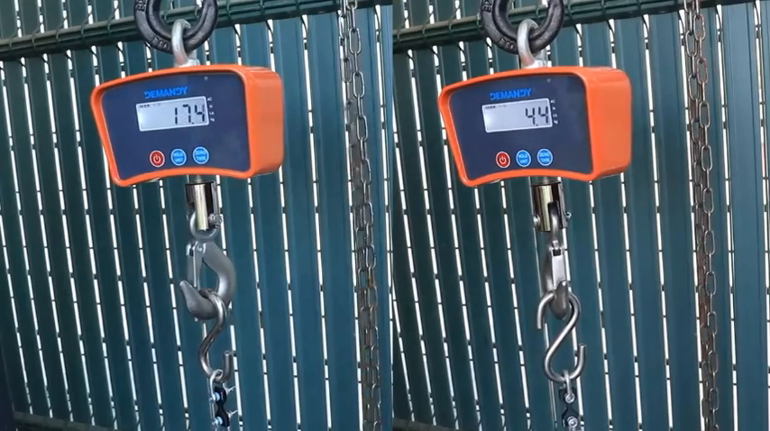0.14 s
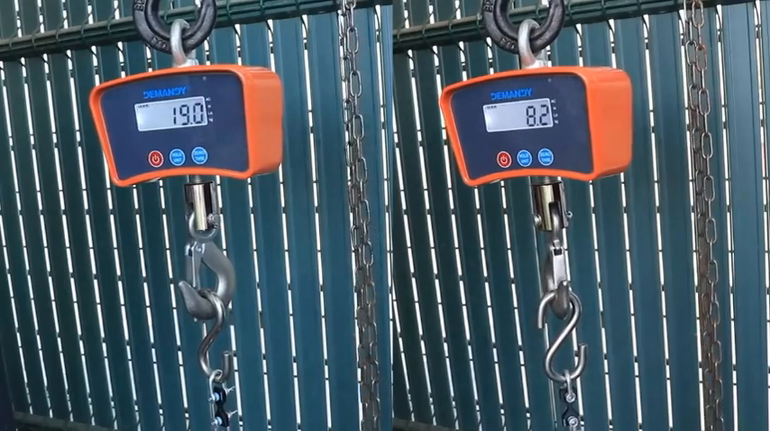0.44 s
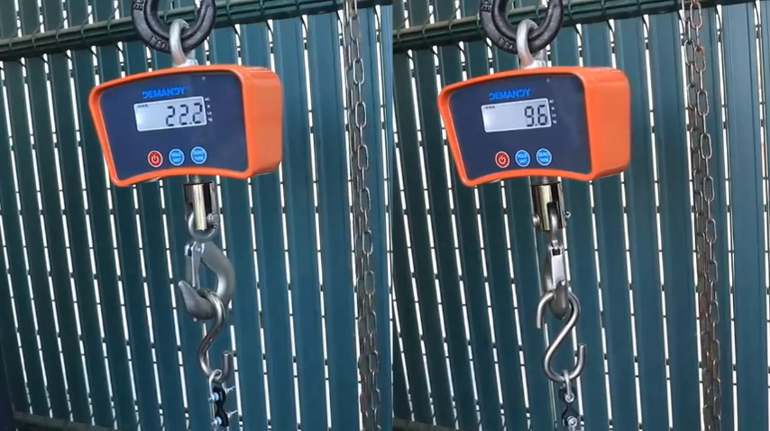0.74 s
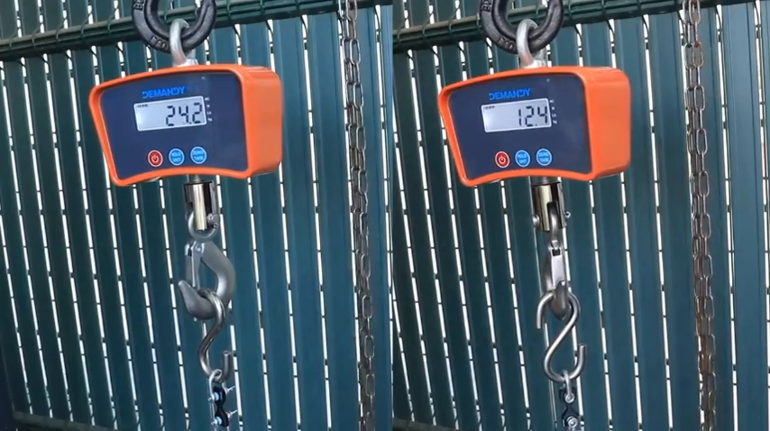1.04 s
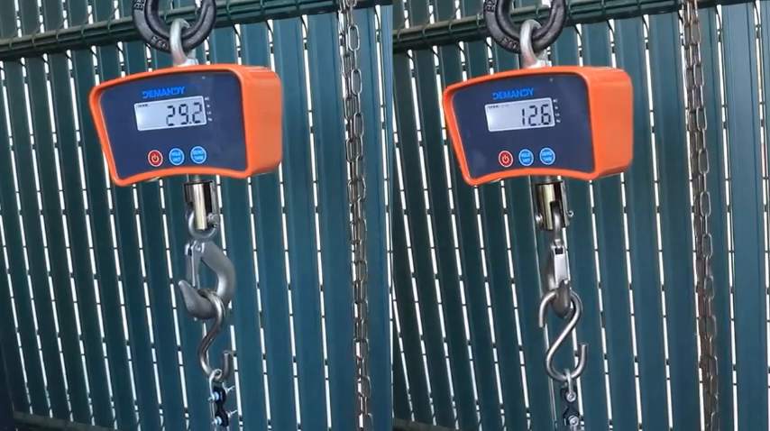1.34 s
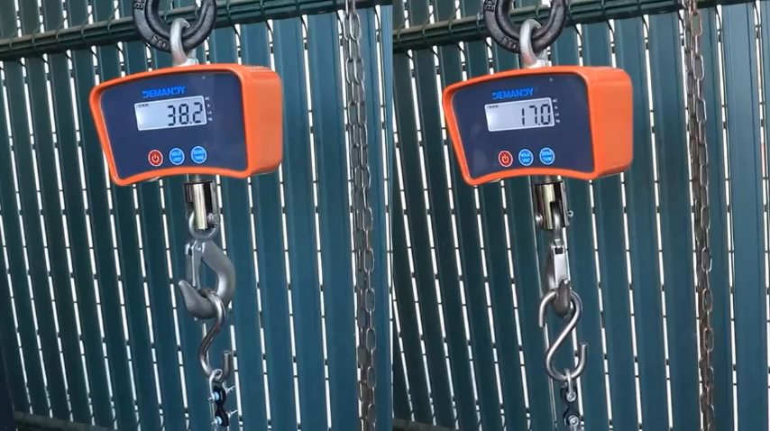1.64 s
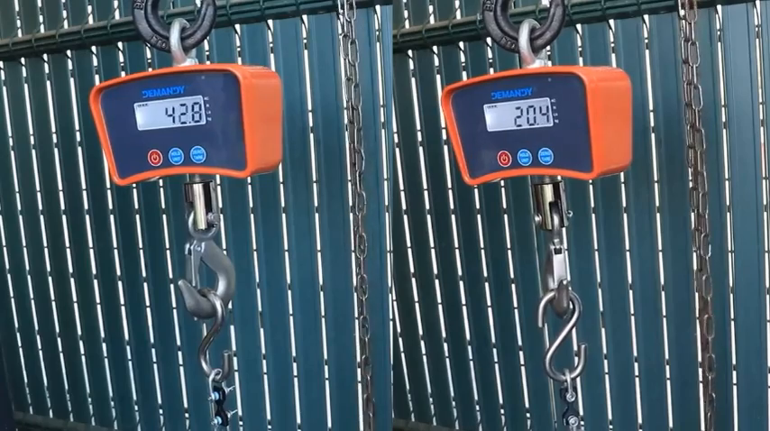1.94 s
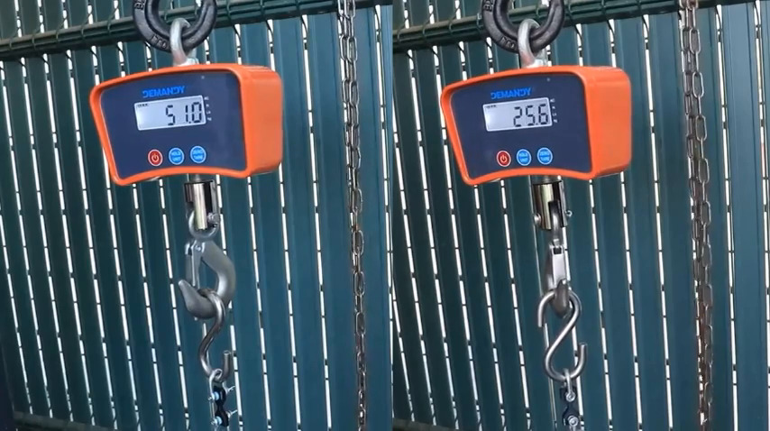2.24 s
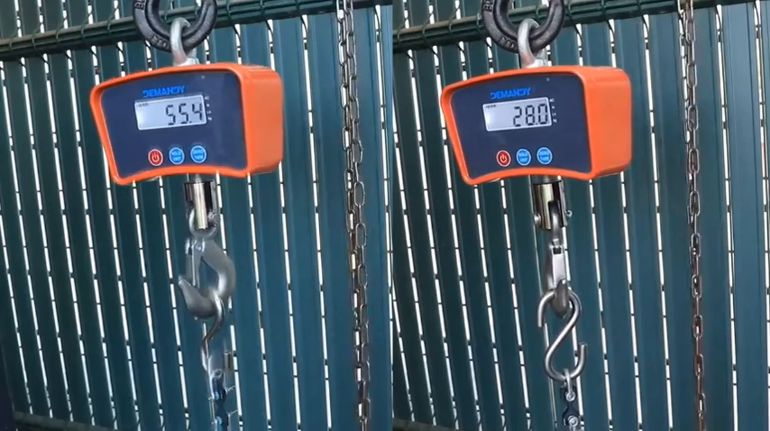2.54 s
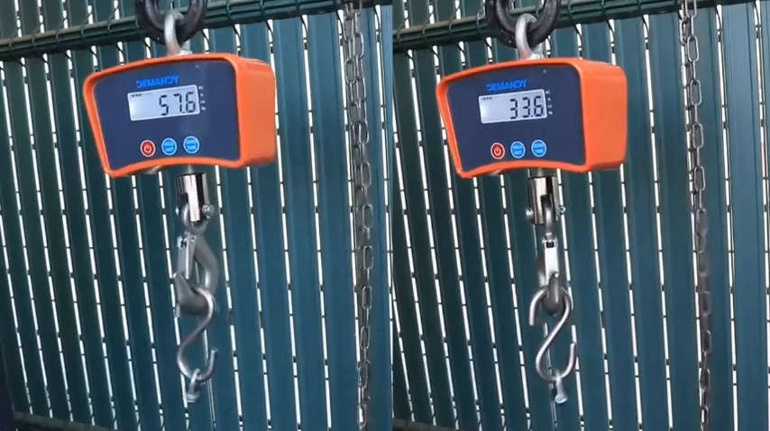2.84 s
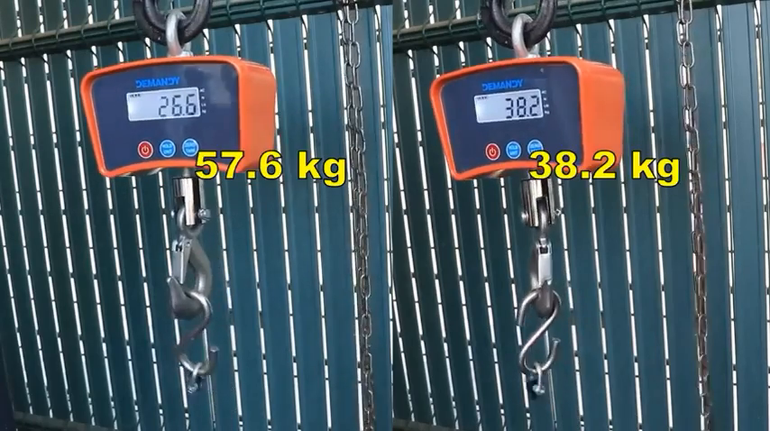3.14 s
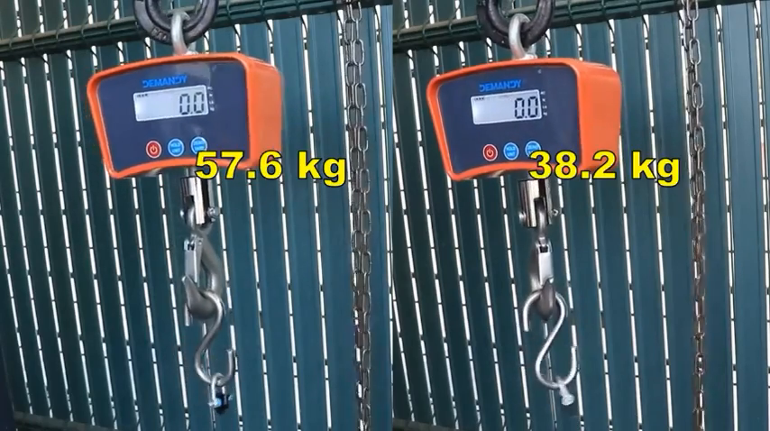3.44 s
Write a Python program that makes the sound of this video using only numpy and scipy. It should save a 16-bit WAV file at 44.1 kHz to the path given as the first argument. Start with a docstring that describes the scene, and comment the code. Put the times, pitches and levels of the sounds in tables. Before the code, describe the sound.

Metallic chain clicks under rising strain, then a sudden snap and loud rattle of swinging steel hooks.

```python
"""Chain hoist breaking a hanging scale

Outdoors by a fence, a chain hoist pulls on a hanging scale, a hook and an S-hook. Links click as shaped
noise through resonances; the rig creaks and scrapes as noise-modulated tones and grain. A plastic part
snaps: the freed steel hooks chatter (grit and sine pings), clack and ring (wavering sine modes), then knock
the scale's housing (cracks, damped sines) as they swing out. Fence and ground answer as a noise tail over
faint steady noise. Mono microphone; the recorder's two-band limiter holds the crash down."""
import sys
import numpy as np
from scipy import signal
from scipy.fft import rfft, irfft, next_fast_len
from scipy.io import wavfile
from scipy.ndimage import uniform_filter1d, minimum_filter1d, map_coordinates

SR = 44100
rng = np.random.default_rng(int(sys.argv[2]) if len(sys.argv) > 2 else 0)


def file_out(sig):
    """Save sig as 16-bit WAV at sys.argv[1]."""
    # one column per channel
    cols = np.atleast_2d(sig).T
    # limit, then scale
    lim = np.clip(cols, -1, 1)
    pcm = np.round(lim * 32767).astype(np.int16)
    wavfile.write(sys.argv[1], SR, pcm)


N = 158760  # samples, 3.6 s
TOP_HZ = 15750  # upper band limit of the recorder
LINK_SCATTER_DB = 2.5  # random spread of the chain's resonances from blow to blow

# All levels are relative, ahead of the limiter; colours are noise spectra before scaling to rms 1.
# gritty clicks of chain links under load, then three bright steel clacks during the crash:
# t/s at the end of the rise, level/dB, rise/s
CLICKS = [(0.184, -30, 0.022), (0.392, -32, 0.0046), (.857, -29.5, 0.007), (1.046, -28, 0.004),
          (1.261, -29.5, 0.0037), (1.402, -30.5, 0.0053), (1.474, -33, 0.0057), (1.822, -32, 0.0098),
          (1.88, -30.5, 0.006), (2.04, -32.5, 0.005), (2.295, -32, 0.0061), (2.889, -27.5, 0.0044),
          (2.926, -30, .003), (3.076, -30.5, .003)]
# spectrum of the click grit, also used for ticks: f/Hz, level/dB
CLICK_COLOUR = [(300, -27), (900, -7.5), (1600, -7), (4500, -3.5), (5600, 0), (7200, -2.5), (10300, 2),
                (13000, -6.5), (15800, -2.5)]
# creaks of the loaded rig: t/s, level/dB, t60/s, f/Hz
CREAKS = [(0.053, -52.5, 0.05, 5600), (0.365, -50.5, 0.051, 5400), (0.519, -56.5, 0.063, 2700),
          (0.755, -45.5, 0.025, 5440), (1.002, -44.5, 0.11, 5200), (1.287, -38, 0.052, 4520),
          (1.299, -39.5, 0.078, 2760), (1.345, -47.5, 0.1, 5540), (1.361, -50, 0.057, 6900),
          (1.599, -53.5, 0.043, 5420), (1.727, -40.5, 0.042, 5600), (1.737, -49.5, 0.065, 2560),
          (1.838, -45.5, 0.081, 899), (2.334, -49.5, 0.11, 804), (2.555, -52, 0.059, 5400)]
# spectrum of the creak grit, also used for scrapes: f/Hz, level/dB
CREAK_COLOUR = [(300, -11), (900, 7.5), (2000, 0.5), (2700, 8), (4000, -4), (5600, 9), (8000, -8),
                (15000, -11)]
# spectrum of the cracks, also the filter that dulls the chatter: f/Hz, level/dB
CRACK_COLOUR = [(60, -16), (250, -1.5), (800, 2), (1500, 6), (2900, 5.5), (4000, -6.5), (6000, -10.5),
                (9000, -18), (15000, -39)]


def amp(db):
    """Amplitude of a level in dB."""
    return 10 ** (np.asarray(db) / 20)


def unit(x):
    """Scale to rms 1."""
    return x / np.sqrt(np.mean(x ** 2) + 1e-20)


def along(points, hz):
    """Read (Hz, value) points on a log frequency axis."""
    f, v = np.transpose(points)
    return np.interp(np.log(hz + 1), np.log(f + 1), v)


def filtered(x, response):
    """Multiply the spectrum of x by a response of frequency."""
    m = next_fast_len(len(x) + SR // 2)
    return irfft(rfft(x, m) * response(np.fft.rfftfreq(m, 1 / SR)), m)[:len(x)]


def noise(colour):
    """Coloured noise of rms 1."""
    return unit(filtered(rng.standard_normal(N), lambda hz: amp(along(colour, hz))))


def sine(hz, t):
    """A steady tone."""
    return np.sin(2 * np.pi * hz * t)


def fade(t, t60):
    """Exponential decay that starts at t = 0 and falls 60 dB in t60 seconds."""
    return np.exp(-np.log(1000) * np.maximum(t, 0) / t60)


def add(out, s, sound):
    """Mix a sound in at time s."""
    part = out[max(round(s * SR), 0):][:len(sound)]
    part += sound[:len(part)]


def excerpt(x, s, length):
    """The stretch of a long noise that begins at time s."""
    return np.roll(x, -round(s * SR))[:length]


def seconds():
    """The half-second time axis of one event."""
    return np.arange(SR // 2) / SR


def wobble(per_s):
    """A smooth curve through random points, per_s of them a second."""
    return map_coordinates(rng.standard_normal(size=1024), [np.arange(N) * per_s / SR], mode="wrap")


def contacts(per_s, spread_db, t60):
    """Envelope of rms 1 of many tiny contacts of random time and size."""
    sizes = amp(spread_db * np.clip(rng.standard_normal(N), -2, 2))
    hits = (rng.random(N) < per_s / SR) * sizes
    power = signal.fftconvolve(hits ** 2, fade(seconds(), t60) ** 2)[:N]
    return unit(np.sqrt(np.abs(power)))


def air():
    """Faint steady coloured noise beneath the scene, with a small rise at the very top."""
    # spectrum of the faint noise: f/Hz, level/dB
    air_colour = [(25, -6), (60, -4), (170, 0), (450, -5), (900, -4), (1350, -11), (2000, -18), (4000, -26),
                  (5500, -24), (8000, -30), (13000, -34), (15800, -26)]
    return amp(-62.5) * noise(air_colour)


def yard(x):
    """The diffuse answer of fence and ground: a 5 ms gap, then noise whose decay depends on frequency."""
    # decay of the answer: f/Hz, t60/s
    yard_decay = [(150, 0.33), (1500, 0.18), (4000, 0.16), (12000, 0.09)]
    hz, t, z = signal.stft(rng.standard_normal(SR // 2), SR, nperseg=256)
    decay = fade(t, along(yard_decay, hz)[:, None])
    tail = signal.istft(z * decay, SR, nperseg=256)[1]
    return signal.fftconvolve(x, np.pad(tail, (SR // 200, 0)) / np.linalg.norm(tail))[:N]


def scrapes():
    """Links slide over each other in soft grainy swells as the load comes on."""
    # swells: t/s at the peak, level/dB, half length/s
    swells = [(0.157, -59.5, 0.065), (0.945, -62.5, 0.12), (1.253, -56, 0.047), (1.357, -56.5, 0.067),
              (1.843, -49.5, 0.026), (2.261, -54, 0.029)]
    now = np.arange(N) / SR
    swell = sum(amp(db) * np.exp(-((now - s) / length) ** 2) for s, db, length in swells)
    return swell * noise(CREAK_COLOUR) * contacts(per_s=300, spread_db=2, t60=0.037)


def creaks():
    """A slipping joint rasps around its own pitch; tiny ticks fall at random times."""
    width_hz, tone_db, grit_db = 250, 1, -2
    ticks_per_s, tick_t60 = 17, 0.021
    t, rasp, tone, ticks = seconds(), np.zeros(N), np.zeros(N), np.zeros(N)
    # slow noise that spreads each tone into a narrow band
    narrow = unit(filtered(rng.standard_normal(N), lambda hz: 1 / (1 + (2 * hz / width_hz) ** 2)))
    for s, db, t60, hz in CREAKS:
        shape = amp(db) * np.minimum(t / 0.0073, 1) * fade(t - .003, t60)
        add(rasp, s - .002, shape)
        add(tone, s - .002, shape * sine(hz, t))
    for when, size in rng.random((int(ticks_per_s * N / SR), 2)):
        tick_db = -59.5 - 1.5 * (2 * size - 1.5)
        add(ticks, when * N / SR, amp(tick_db) * fade(t, tick_t60))
    grit = rasp * noise(CREAK_COLOUR) * contacts(per_s=600, spread_db=1, t60=0.0082)
    return amp(tone_db) * tone * narrow + amp(grit_db) * grit + ticks * noise(CLICK_COLOUR)


def taut_chain():
    """Every click, clack and creak leaves a faint ring of the taut chain in a few sine modes."""
    # lasting modes of the chain: f/Hz, level/dB relative to the blow, before scatter
    taut_modes = [(2720, -36), (3145, -33), (4110, -33), (5290, -37), (5750, -38), (6610, -33)]
    ring_t60, creak_db = 0.39, 3.5  # creaks drive the ring harder than their level says
    t, out = seconds(), np.zeros(N)
    blows = [row[:2] for row in CLICKS] + [(s, db + creak_db) for s, db, *_ in CREAKS]
    for s, db in blows:
        for hz, level in taut_modes:
            scattered = db + level + LINK_SCATTER_DB * rng.standard_normal()
            add(out, s, amp(scattered) * fade(t, ring_t60) * sine(hz, t))
    return out


def chain():
    """Gritty link clicks, later bright steel clacks: noise through shared and random resonances."""
    # resonances that all clicks and clacks share: f/Hz, width/Hz, level/dB before scatter
    shared = [(1634, 170, 2), (2640, 96, 8), (5330, 140, 0), (5666, 125, 9), (9860, 92, 3.5),
              (11900, 110, 7)]
    click_t60, link_t60, link_db = 0.041, 0.17, -14.5  # quick decay, and a weaker long one
    own_modes, own_range_hz, own_width_hz, own_db = 14, (3002, 13520), 55, 5.5
    t, out = seconds(), np.zeros(N)
    grit = noise(CLICK_COLOUR) * contacts(per_s=1900, spread_db=3.0, t60=0.011)
    for s, db, rise in CLICKS:
        decay = np.hypot(fade(t - rise, click_t60), amp(link_db) * fade(t - rise, link_t60))
        shape = amp(db - 2.5) * np.minimum(t / rise, 1) ** 2 * decay  # all of them 2.5 dB down
        own = [(hz, own_width_hz, own_db) for hz in rng.uniform(*own_range_hz, size=own_modes)]

        def body(f):
            """Direct click plus band-pass resonances of scattered strength."""
            response = 1
            for centre, width, level in shared + own:
                gain = amp(level + LINK_SCATTER_DB * rng.standard_normal())
                response = response + gain * 1j * f * width / (centre ** 2 - f ** 2 + 1j * f * width)
            return response

        add(out, s - rise, filtered(shape * excerpt(grit, s, len(t)), body))
    return out


def bumps():
    """Dull bumps of the scale's housing: a few low cycles with a puff of noise."""
    # bumps: t/s, level/dB, f/Hz
    housing = [(2.974, -27.5, 190), (3, -28, 187), (3.1193, -14, 295), (3.191, -22.5, 300)]
    bump_t60, fuzz = 0.023, 0.2  # decay in s, share of puff
    t, out = seconds(), np.zeros(N)
    puff = noise([(30, -25), (150, -6), (600, 7), (1500, -20), (5000, -45.5)])  # (Hz, dB)
    for s, db, hz in housing:
        body = sine(hz, t) + fuzz * excerpt(puff, s, len(t))
        add(out, s, amp(db) * (1 - np.exp(-t / 0.0009)) * fade(t, bump_t60) * body)
    return out


def knocks():
    """Each knock of the swinging hardware is a noise crack and one quickly damped resonance."""
    # knocks: t/s, ring level/dB before a common 3.5 dB lift, ring f/Hz, crack level/dB
    strikes = [(2.0152, -34.5, 2170, -36), (2.843, -25.5, 2750, -36), (2.851, -24.5, 2750, -48),
               (2.9651, -11, 2300, -11), (2.9913, -14, 1754, -15.5), (3.027, -25, 1620, -33),
               (3.051, -13, 2900, -16.5), (3.074, -21, 2820, -45), (3.083, -20, 2795, -45),
               (3.093, -15.5, 1476, -49), (3.098, -18, 2740, -23.5), (3.156, -30, 850, -28),
               (3.1641, -17, 1364, -20), (3.203, -12, 2200, -17), (3.213, -22.5, 2880, -31.5),
               (3.2337, -20.5, 1490, -30.5), (3.241, -25.5, 1940, -59), (3.269, -31, 2560, -60),
               (3.289, -36, 2900, -34.5), (3.329, -30.5, 925, -31), (3.338, -41, 2340, -35),
               (3.362, -46, 2230, -37), (3.4143, -30, 1550, -27.5), (3.4586, -42, 1510, -35),
               (3.468, -39, 2220, -37)]
    knock_t60, crack_t60, rise_s = 0.02, 0.028, 0.00053
    t, rings, cracks = seconds(), np.zeros(N), np.zeros(N)
    onset = 1 - np.exp(-t / rise_s)
    for s, ring_db, hz, crack_db in strikes:
        add(rings, s, amp(ring_db) * onset * fade(t, knock_t60) * sine(hz, t))
        add(cracks, s, amp(crack_db) * onset * fade(t, crack_t60))
    return amp(3.5) * rings + cracks * noise(CRACK_COLOUR)


def hums():
    """The low bending note of a flung hook, a decaying sine."""
    # notes: t/s, level/dB, f/Hz, t60/s
    notes = [(2.69, -28.5, 445, 0.047), (2.735, -32, 462.4, 0.35), (3.06, -41, 487, 0.67)]
    t, out = seconds(), np.zeros(N)
    for s, db, hz, t60 in notes:
        add(out, s, amp(db) * (1 - np.exp(-t / 0.0019)) * fade(t, t60) * sine(hz, t))
    return out


def chatter():
    """The break throws shackles and links together: dense small contacts as grit and pings, later duller."""
    # strength after the break: t/s, level/dB
    strength_points = [(2.687, -26), (2.704, -24), (2.72, -23.5), (2.745, -25.5), (2.77, -18), (2.804, -28),
                       (2.825, -28), (2.885, -33.5), (2.915, -39.5), (2.96, -40.5), (2.988, -34),
                       (3.0, -27), (3.04, -30.5), (3.08, -28.5), (3.115, -35), (3.17, -41.5), (3.22, -38),
                       (3.32, -49), (3.47, -50), (3.6, -82)]
    # spectrum of the grit: f/Hz, level/dB
    grit_colour = [(40, -10), (80, -6.5), (160, 2), (400, -1), (650, 0.5), (900, 6.5), (1500, -2.5),
                   (3000, 6.5), (7500, 8), (11000, 1.5), (13500, 5.5), (15800, 3)]
    pings_per_s, ping_hz, spread_oct, ping_t60 = 520, 3790, 1.1, 0.04  # median pitch and its spread
    ping_db, ping_spread_db, grit_db, dull_db = -11, 2.1, -1.5, -0.5
    dulling_s, dulling_len_s = 3.037, 0.43  # start and length of the crossfade to dull
    now, start = np.arange(N) / SR, strength_points[0][0]
    strength = amp(np.interp(now, *np.transpose(strength_points))) * (now > start)
    t, pings = seconds()[:SR // 10], np.zeros(N)
    draws = rng.standard_normal((int(pings_per_s * (N / SR - start)), 3))
    for k, (late, pitch, size) in enumerate(draws):
        hz = ping_hz * 2 ** (spread_oct * pitch)
        if hz < TOP_HZ:
            ping = amp(ping_db + ping_spread_db * size) * fade(t, ping_t60) * sine(hz, t)
            add(pings, start + (k + late) / pings_per_s, ping)
    grit = noise(grit_colour) * contacts(per_s=450, spread_db=2.5, t60=0.025)
    bright = amp(grit_db) * grit + pings
    dull = amp(dull_db) * filtered(bright, lambda hz: amp(along(CRACK_COLOUR, hz)))
    dullness = np.clip((now - dulling_s) / dulling_len_s, 0, 1)
    return strength * ((1 - dullness) * bright + dullness * dull)


def hooks():
    """Steel modes held ringing through the chatter, then dying freely; each clang lifts one of them."""
    # modes of the steel hooks: f/Hz, level/dB while they chatter, t60/s
    hook_modes = [(1434, -53, .5), (3672, -41, .75), (4426, -41, .65), (5535, -51, .3), (6565, -43, .45),
                  (6729, -38, .8), (8344, -35, .36), (10200, -40, .45), (12610, -40, .36),
                  (14840, -43, .36)]
    # hook strikes hook, driving the nearest mode: t/s, f/Hz, level/dB, length of contact/s
    clangs = [(2.46, 3672, -64, 0.0082), (2.555, 3672, -50, 0.0067), (2.705, 5535, -27, .025),
              (2.706, 6565, -28, 0.042), (2.712, 3672, -28.5, 0.029), (2.72, 12610, -22, .028),
              (2.741, 4426, -23.5, 0.017), (2.76, 5535, -26.5, 0.015), (2.787, 4426, -25, .03),
              (2.815, 8344, -20.5, 0.081), (2.818, 6729, -28.5, .022), (2.819, 12610, -27.5, 0.026),
              (2.841, 14840, -27, 0.014), (2.845, 10200, -33, 0.061), (2.886, 3672, -32.5, 0.027),
              (2.926, 6565, -23.5, 0.0089), (3.0, 6565, -27.5, 0.0077), (3.015, 8344, -23.5, 0.062),
              (3.048, 6565, -18.5, 0.019), (3.07, 3672, -34, 0.024), (3.263, 4426, -48, 0.027)]
    ring_from_s, ring_until_s = 2.7, 3.062
    choke_t60, rise_s = 0.042, 0.0033  # decay of a clang, onset of clangs and modes
    # slow random pitch drift and level wobble broaden each ringing mode
    beat_per_s, beat_db, wander_rad = 70, 3, .4  # random points a second, level and phase spread
    drift_hz, drift_per_s = 11, 25  # pitch spread, random points a second
    now, out = np.arange(N) / SR, np.zeros(N)

    def held(start, end, t60):
        """Rise at start, hold, decay from end."""
        return np.clip((now - start) / rise_s, 0, 1) * fade(now - end, t60)

    def nearest(pitch):
        """The mode closest to a pitch."""
        return min((row[0] for row in hook_modes), key=lambda hz: abs(hz - pitch))

    for hz, level, t60 in hook_modes:
        swing = amp(level) * held(ring_from_s, ring_until_s, t60)
        for s, pitch, db, length in clangs:
            if nearest(pitch) == hz:
                swing = np.hypot(swing, amp(db) * held(s, s + length, choke_t60))
        turns = np.cumsum(hz + drift_hz * wobble(drift_per_s)) / SR  # cycles so far
        phase = 2 * np.pi * turns + wander_rad * wobble(beat_per_s)
        out += swing * amp(beat_db * wobble(beat_per_s)) * np.sin(phase)
    return out


def scene():
    """All sources, the answer of the yard and the faint noise, as they reach the microphone."""
    links = chain() + taut_chain() + creaks() + scrapes()
    swinging = knocks() + bumps()
    steel = hooks()
    echo = yard(amp(-7) * links + amp(-13) * swinging + amp(-14) * steel)  # sends in dB
    return (air() + echo + links + swinging + hums() + chatter() + steel)[None]


def limited(x, top_db):
    """Turn the level down just around each peak that passes the ceiling."""
    size = int(0.0014 * SR) + 1  # hold of 1.4 ms
    needed = np.minimum(1, amp(top_db) / (np.abs(x) + 1e-9))
    return x * uniform_filter1d(minimum_filter1d(needed, size), size)


def record(dry):
    """The recorder: a fast two-band limiter, then the band limit."""
    split_hz, low_limit_db, high_limit_db = 3440, -19.5, -14
    low = filtered(dry[0], lambda hz: 1 / (1 + (hz / split_hz) ** 10))
    held = limited(low, low_limit_db) + limited(dry[0] - low, high_limit_db)
    return filtered(held, lambda hz: 1 / np.sqrt(1 + (hz / TOP_HZ) ** 200))[None]


dry = scene()
out = record(dry)
file_out(out)
```